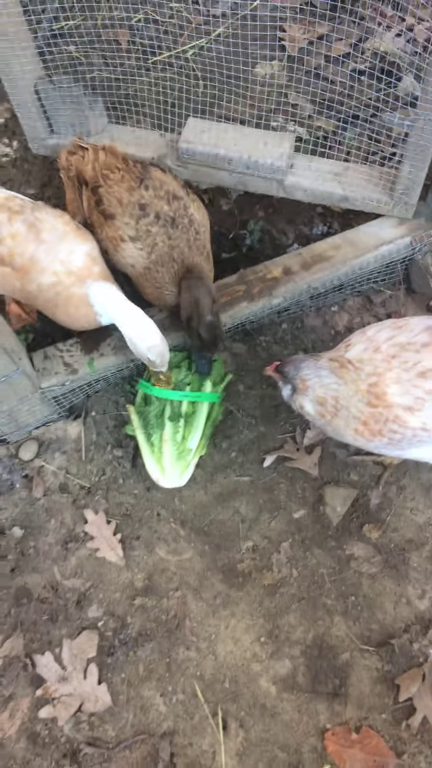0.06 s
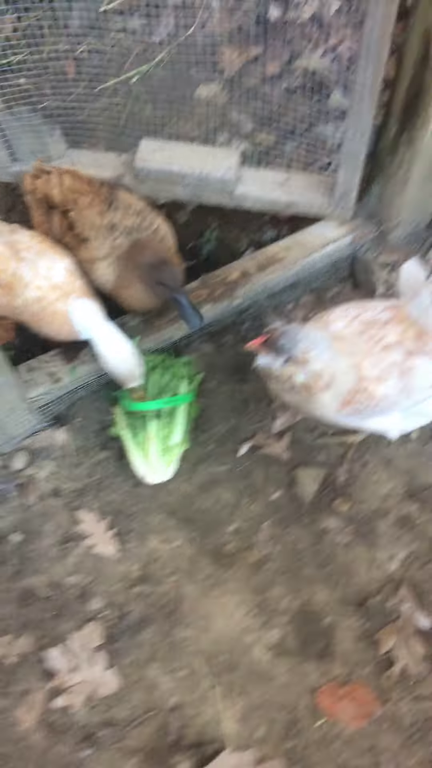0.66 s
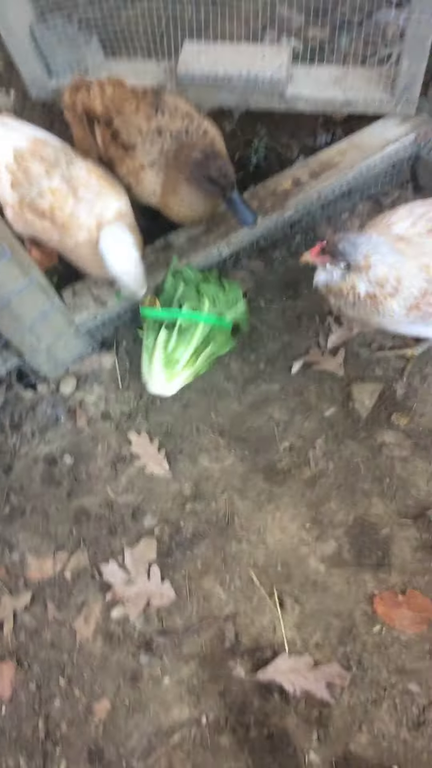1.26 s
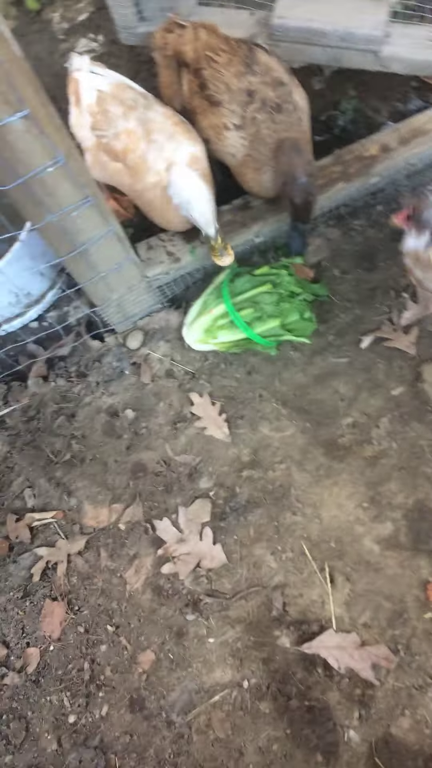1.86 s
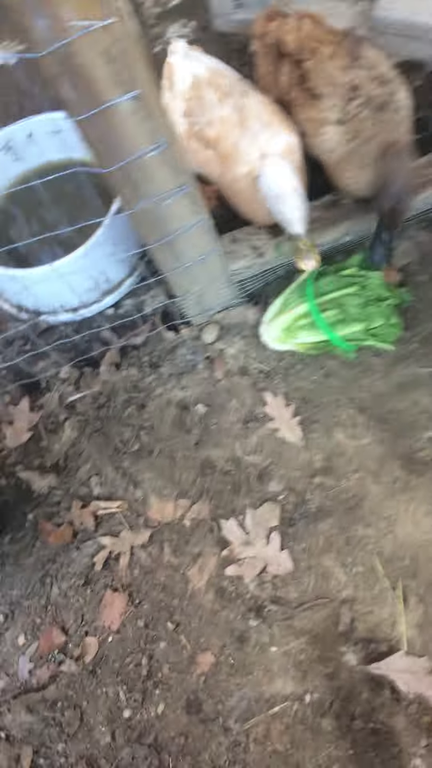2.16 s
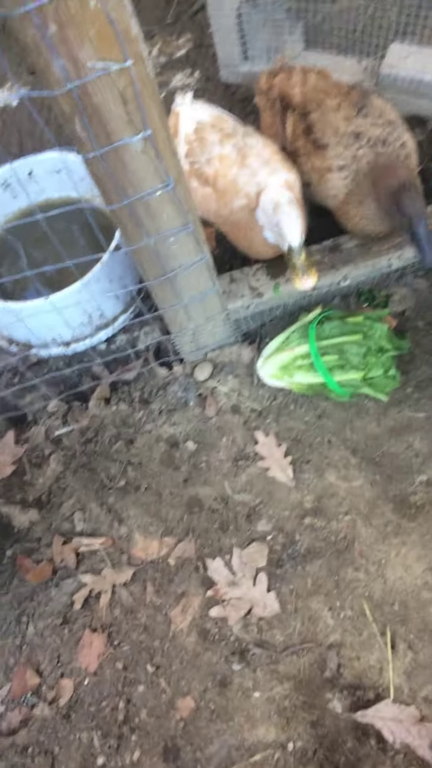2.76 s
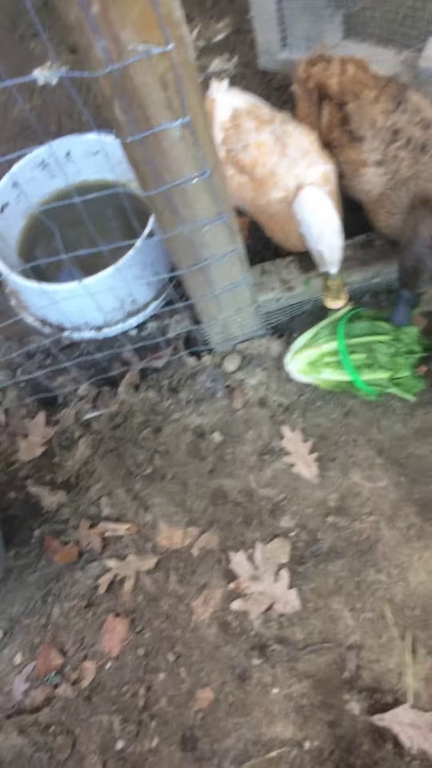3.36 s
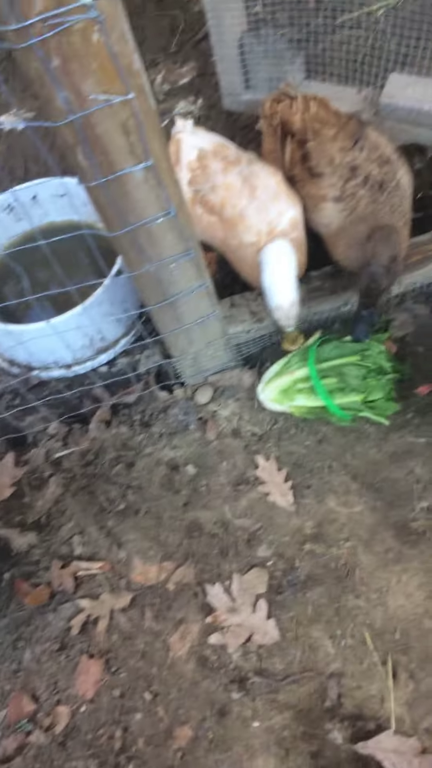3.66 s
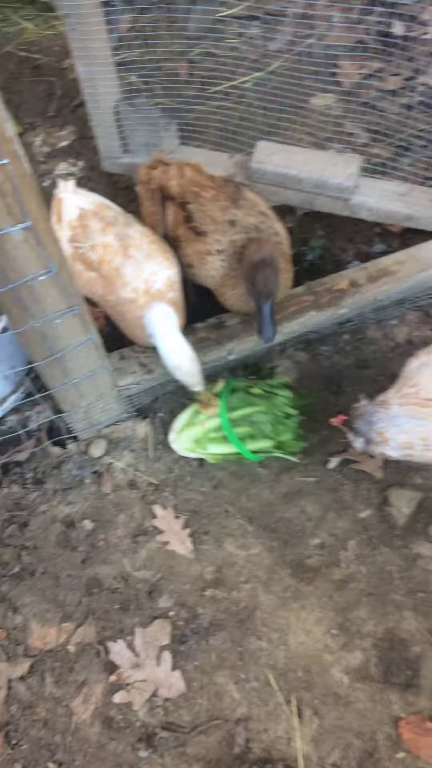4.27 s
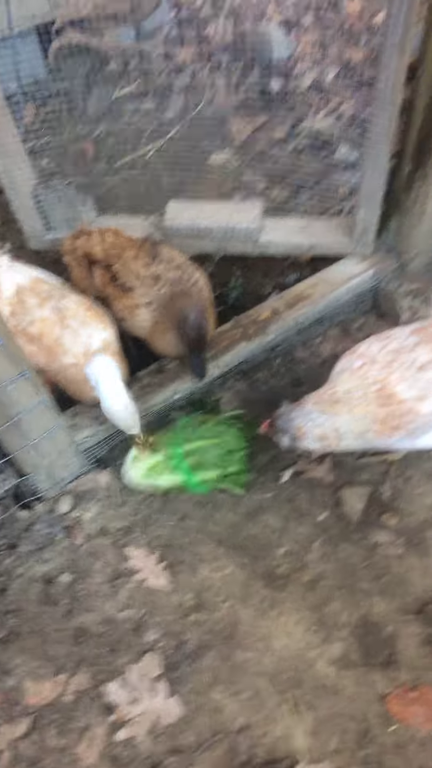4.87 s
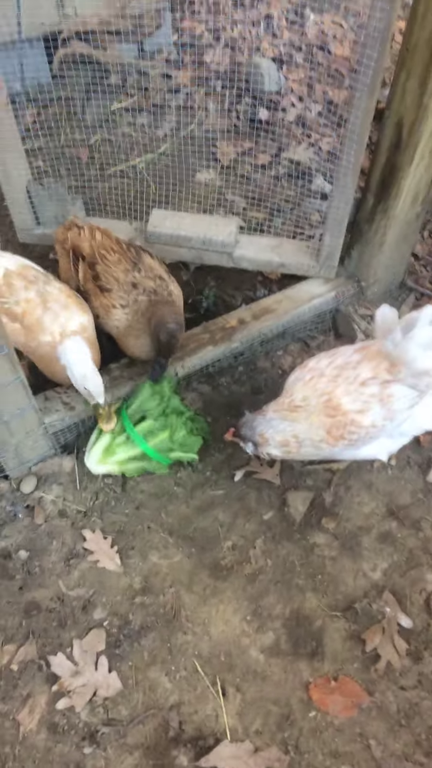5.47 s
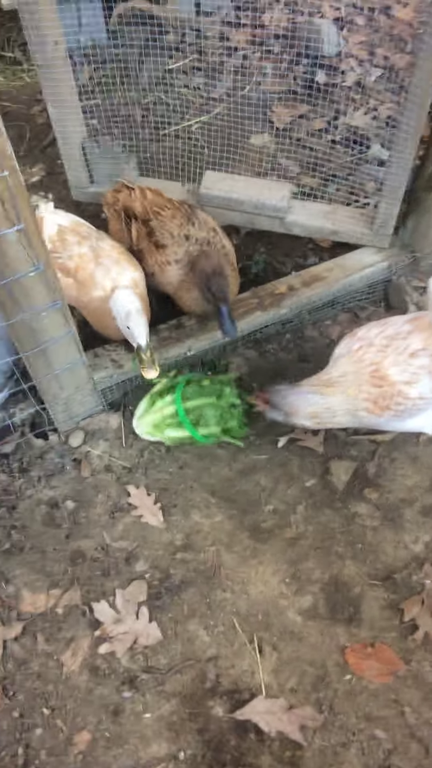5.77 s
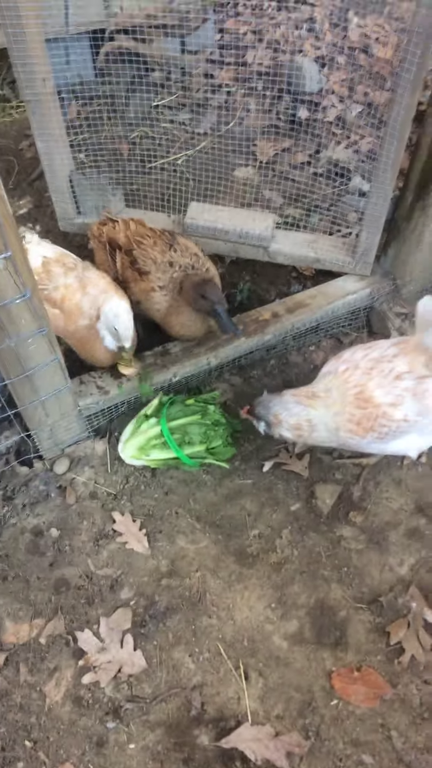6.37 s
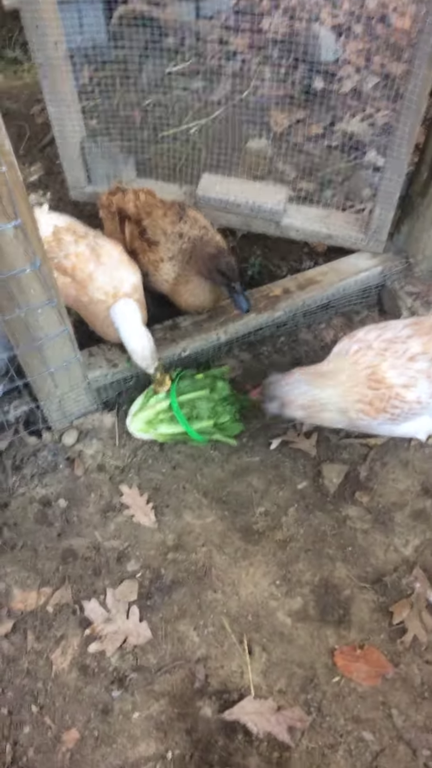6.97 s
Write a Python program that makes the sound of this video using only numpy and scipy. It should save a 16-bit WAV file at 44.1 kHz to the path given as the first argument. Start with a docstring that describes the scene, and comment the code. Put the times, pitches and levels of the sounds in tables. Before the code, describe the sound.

Two ducks eat lettuce close by in an outdoor pen, making a continuous fine crackle over dull scuffs of soil. In the first second or so, leaf ribs snap, wet bills clap and a few pecks knock on a wooden sill. A faint, distant engine hums from about 0.5 to 3 seconds. A hen gives soft, short clucks from 1.3 seconds, a thin, wavering, slightly raspy croon just after 2, and another cluck at 2.5, while the feeding eases. From about 3.7 seconds the tearing, crunching and snapping pick up, busiest between 4.7 and 5.6. The hen clucks again from 5 to 5.8 seconds. Lighter nibbles and taps continue to the end at about 7 seconds. Soft low bumps and a slight rumble of moving air touch the microphone now and then, mostly around 3 and 5.5 to 6 seconds. Echoes are very short.

```python
"""Ducks eating lettuce

Two ducks nibble and tear a head of lettuce in an outdoor pen while a hen clucks and croons softly.
Leaves rustle, ribs snap, wet bills crunch, clap and knock on a wooden sill; boards and ground throw
back short echoes. An engine hums far away, and feet, hand and moving air bump the microphone softly."""
import sys
import numpy as np
from scipy import signal
from scipy.fft import rfft, irfft
from scipy.io import wavfile

SR = 44100
rng = np.random.default_rng(int(sys.argv[2]) if len(sys.argv) > 2 else 0)


def put_to_file(sound):
    """Save the sound as 16-bit audio at rate SR, in the file named by the first command-line argument."""
    columns = np.atleast_2d(sound).T  # one column per channel
    safe = np.clip(columns, -1, 1)
    whole_steps = np.round(safe * 32767)
    wavfile.write(sys.argv[1], SR, whole_steps.astype(np.int16))


N = 313992
TIME = np.arange(N) / SR


def amp(db):
    """Decibels to gain."""
    return 10 ** (np.asarray(db) / 20)


def unit(x):
    """Scales to rms 1."""
    return x / np.sqrt(np.mean(x ** 2) + 1e-20)


def read(points, hz):
    """Reads a curve on a log-frequency axis."""
    f, value = np.transpose(points)
    return np.interp(np.log(hz + 1), np.log(f + 1), value)


def add(mix, start_s, sound):
    """Mixes a sound in at start_s."""
    part = mix[max(round(start_s * SR), 0):][:len(sound)]
    part += sound[:len(part)]


def ring(gain_db, size=2048):
    """The minimum-phase impulse response, of energy 1, of a gain given as a function of frequency."""
    hz = abs(np.fft.fftfreq(size, 1 / SR)) + 1
    log_gain = np.log(amp(np.maximum(gain_db(hz), -90)))
    response = np.fft.ifft(np.exp(np.conj(signal.hilbert(log_gain)))).real[:size // 2]
    return response / np.linalg.norm(response)


def bell(hz, octaves, ring_hz, ring_db, q):
    """The colour of one break: a broad band around hz, plus one resonance of leaf, bill or board."""
    def gain_db(f):
        broad = (1 + (np.log2(f / hz) / octaves) ** 2 / 6) ** -3.5 * hz / f
        low_cut = 1 / (1 + (350 / f) ** 4)
        resonance = 1 + amp(ring_db) ** 2 / (1 + (q * (f / ring_hz - 1)) ** 2)
        return 10 * np.log10(broad * low_cut * resonance + 1e-12)
    return ring(gain_db)


def tint(x, spectrum):
    """Gives a long sound a spectrum, at rms 1."""
    gain = amp(read(spectrum, np.fft.rfftfreq(len(x), 1 / SR)))
    return unit(irfft(rfft(x) * gain, len(x)))


def resonate(x, hz, width_hz):
    """One resonance with gain near 1 at its peak; hz may glide."""
    turn = np.exp(2j * np.pi * np.cumsum(hz * np.ones(len(x))) / SR)
    pole = np.exp(-np.pi * width_hz / SR)
    return 2 * (turn * signal.lfilter([1 - pole], [1, -pole], x / turn)).real


def drift(hz):
    """A random wander of rms 1, no faster than hz."""
    return unit(irfft(rfft(rng.standard_normal(N)) * (np.fft.rfftfreq(N, 1 / SR) < hz), N))


def breaks(size, per_s, spread_db):
    """Random clicks of either sign: many small, a few large."""
    chance, strength, side = rng.random((3, size))
    level_db = spread_db * np.minimum(-np.log(1 - strength), 4)
    return (chance < per_s / SR) * np.sign(side - .5) * amp(level_db)


def crush(length_s, colour, per_s=3200, spread_db=2.0, mush=0.064, size=4096):
    """A pressing bill sets off a run of tiny breaks that ring with a colour; rms 1 over length_s."""
    pressure = np.exp(-(np.abs(np.arange(size) / SR / length_s - .5) * 2) ** 3)
    cells = breaks(size, per_s, spread_db) + mush * rng.standard_normal(size)
    crunch = signal.fftconvolve(cells * pressure, colour)
    return crunch * np.sqrt(length_s * SR / np.sum(crunch ** 2))


def pen(x, near_db, tail_db, size=12000, echoes=8):
    """Adds a few early echoes from ground and boards, then a faint short tail."""
    # how long the pen rings: frequency_hz, t60_s
    decay = [(200, 0.26), (1000, 0.1), (4000, 0.045), (15000, 0.019)]
    near = np.zeros(size)
    delays = (rng.uniform(.002, .014, echoes) * SR).astype(int)
    near[delays] = rng.choice([-1, 1], echoes) / np.sqrt(echoes)
    hz, t, noise = signal.stft(rng.standard_normal(size), SR, nperseg=256)
    tail = signal.istft(noise * amp(-60 * t / read(decay, hz)[:, None]), SR, nperseg=256)[1][:size]
    tail *= np.minimum(np.arange(size) / SR / 0.00098, 1)
    response = amp(near_db) * near + amp(tail_db) * tail / np.linalg.norm(tail)
    return x + signal.oaconvolve(x, response)[:N]


def outdoors(air_db=-61, engine_hz=82, waver=0.0063):
    """A bed of still air, and a far engine whose hum swells and then sinks back."""
    # colour of the open air: frequency_hz, gain_db
    air = [(20, -27), (55, 11), (85, 8), (160, -1.5), (335, -7), (734, -5), (1250, -6.5), (2100, -26.5),
           (3700, -20), (15000, -24)]
    engine_db = np.interp(TIME, [0, .4, .9, 2.3, 3.1], [-87, -69.5, -64.0, -65.5, -72.5])
    turns = np.cumsum(engine_hz * (1 + waver * drift(8.2))) / SR
    engine = np.sqrt(2) * np.sin(2 * np.pi * turns)
    return amp(air_db) * tint(rng.standard_normal(N), air) + amp(engine_db) * engine


def leaf_ticks(per_s=1800, bands=12):
    """Nibbled leaves give off tiny ticks all across the treble."""
    ticks = np.zeros(N)
    for hz in np.geomspace(1500, 15000, bands):
        clicks = breaks(N, per_s / bands, spread_db=1)
        colour = bell(hz, octaves=0.53, ring_hz=hz, ring_db=6.9, q=14)
        ticks += np.sqrt(hz) * signal.oaconvolve(clicks, colour)[:N]
    return unit(ticks)


def wet_ticks(per_s=260, bands=36, size=500):
    """Wet bills part with tiny pitched ticks that die within a few cycles."""
    t, out = np.arange(size) / SR, np.zeros(N)
    for hz in np.geomspace(2200, 7000, bands):
        tick = np.exp(-t * hz / 5) * np.sin(2 * np.pi * hz * t)
        out += hz * signal.oaconvolve(breaks(N, per_s / bands, spread_db=2.1), tick)[:N]
    return unit(out)


def tugging(rise_share=0.48, release_share=0.39):
    """Envelopes for tearing and dragging the leaves: each tug tightens, holds and lets go."""
    # tugs that drag leaves over the soil: start_s, length_s, crackle_db, scuff_db
    tugs = [(0.154, 0.042, -51, -80), (0.226, 0.1, -46.5, -57), (0.378, 0.15, -52.5, -60),
            (0.648, 0.13, -72, -54.5), (1.137, 0.084, -50, -68), (1.484, 0.16, -59, -53.5),
            (1.593, 0.13, -55, -59), (2.8, 0.096, -57.5, -76), (3.05, 0.22, -61.5, -62),
            (3.408, 0.12, -61.5, -64), (3.673, 0.058, -47, -52.5), (3.724, 0.059, -56.5, -57.5),
            (3.858, 0.091, -54, -54), (3.92, 0.21, -47.5, -57.5), (4.168, 0.17, -54, -78),
            (4.338, 0.18, -51.5, -66), (4.496, 0.089, -54, -56.5), (4.549, 0.16, -57.5, -61.5),
            (4.682, 0.095, -47.5, -51.5), (4.796, 0.15, -50, -59.5), (4.946, 0.097, -46, -51.5),
            (5.207, 0.16, -46, -51), (5.442, 0.037, -49, -61), (5.56, 0.07, -44, -55),
            (5.76, 0.27, -58, -60), (6.1, 0.048, -80, -54), (6.227, 0.1, -56.5, -58),
            (6.29, 0.14, -56, -71), (6.628, 0.058, -55.5, -52.5), (6.998, 0.051, -54.5, -53.5)]
    pull, drag = np.zeros((2, N))
    for start_s, length_s, crackle_db, scuff_db in tugs:
        progress = np.arange(0, length_s, 1 / SR) / length_s
        effort = np.clip(np.minimum(progress / rise_share, (1 - progress) / release_share), 0, 1)
        add(pull, start_s, amp(crackle_db) * effort)
        add(drag, start_s, amp(scuff_db) * effort)
    return pull, drag


def rustle(leaves_trim_db=-4, feet_trim_db=-2, clump_db=2.4, dabble_per_s=8.2, dabble_db=3):
    """Leaves crackle in clumps and tear fibre by fibre, over the duller scuff of bills and feet."""
    # how busily the birds shuffle between tugs: time_s, leaves_db, feet_db
    shuffle = [(0, -50.5, -56), (0.9, -55.5, -58.5), (1.45, -51, -56.5), (1.9, -62.5, -65.5),
               (2.55, -59, -66.5), (3.1, -58.5, -65.5), (3.6, -64.5, -65.5), (4.2, -62, -63),
               (4.8, -57, -61.5), (5.05, -47.5, -50), (5.5, -50.5, -54), (5.75, -54.5, -60),
               (6.3, -59, -60), (6.58, -59.5, -66.5), (7.1, -58, -61.5)]
    # crisp colour of nibbled leaves: frequency_hz, gain_db
    crackle = [(500, -20), (1500, 0.5), (2500, 0.5), (4200, 3), (6500, 1.5), (9500, 3), (13000, 0),
               (16000, -5.5)]
    # bright colour of a tearing leaf: frequency_hz, gain_db
    tear = [(500, -12), (1500, 4), (2500, 0), (4200, 7), (4900, 2), (6500, 4.5), (9500, 3), (13000, 2),
            (16000, -5.5)]
    # dull colour of scuffed soil: frequency_hz, gain_db
    scuff = [(90, -13), (220, 6), (420, 4), (700, 9.5), (1100, 0.5), (1800, 2.5), (3000, -10.5),
             (8000, -13)]
    time_s, leaves_db, feet_db = np.transpose(shuffle)
    pull, drag = tugging()
    clumps = amp(clump_db * drift(70))
    # a feeding bill chatters open and shut
    chatter_db = dabble_db * np.sin(2 * np.pi * np.cumsum(dabble_per_s * (1 + 0.26 * drift(9.6))) / SR)
    ticks = leaf_ticks()
    fibres = unit(pen(breaks(N, per_s=1000, spread_db=2.9), near_db=-6, tail_db=-7))
    grain = .7 * ticks + .5 * wet_ticks() + np.roll(fibres, N // 2)  # out of step with the tearing
    soil = tint(unit(breaks(N, per_s=1200, spread_db=0.95)) + 1.17 * rng.standard_normal(N), scuff)
    nibbling = tint(grain, crackle) * amp(np.interp(TIME, time_s, leaves_db) + leaves_trim_db + chatter_db)
    tearing = tint(fibres, tear) * pull
    scuffing = soil * np.hypot(amp(np.interp(TIME, time_s, feet_db) + feet_trim_db), drag)
    return clumps * (nibbling + tearing + scuffing)


def snaps(trim_db=-1, splinter=0.28, splinter_s=0.0016, size=300):
    """A leaf rib gives way at once and splinters for a millisecond or two; the broken piece rings."""
    # single cracks of a rib: start_s, level_db, centre_hz, ring_hz
    cracks = [(0.2513, -39.5, 4530, 4600), (0.274, -37.5, 3550, 4470), (0.2873, -36, 1700, 720),
              (0.2955, -43, 1480, 700), (1.0431, -35, 10150, 8400), (1.3765, -42, 2540, 3700),
              (1.566, -39, 4270, 11500), (2.34, -41, 9440, 3830), (3.694, -29.5, 6100, 6600),
              (3.7666, -38.5, 8750, 3980), (4.0056, -43, 6030, 4220), (4.037, -40, 8000, 4170),
              (4.052, -39, 6250, 11000), (4.1959, -41.5, 2570, 1530), (4.4112, -37, 6250, 6040),
              (4.4679, -32, 5100, 3450), (4.72, -35, 2620, 2080), (4.8233, -37, 8070, 3840),
              (4.836, -36, 6270, 10400), (5.276, -38, 5320, 4020), (5.2848, -40, 8000, 7500),
              (5.3013, -35.5, 9360, 7100), (5.3832, -30.5, 8450, 7200), (5.5758, -35.5, 6130, 4470),
              (5.5945, -38.5, 7900, 4700), (6.6483, -44, 4860, 830)]
    out, t = np.zeros(N), np.arange(size) / SR
    for start_s, level_db, centre_hz, ring_hz in cracks:
        fracture = (t == 0) + splinter * rng.standard_normal(size) * np.exp(-t / splinter_s)
        crack = np.convolve(fracture, bell(centre_hz, octaves=0.72, ring_hz=ring_hz, ring_db=11, q=9))
        crack *= np.sqrt(.003 * SR / np.sum(crack ** 2))  # the energy of 3 ms at rms 1
        add(out, start_s, amp(level_db + trim_db) * crack)
    return out


def rasps():
    """The ridged edge of a bill catches and slips on a rib; each slip rings the hollow of the bill."""
    # scrapes along a rib: start_s, length_s, level_db, ring_hz
    scrapes = [(0.255, 0.016, -44, 4500), (3.973, 0.15, -57, 4150), (4.386, 0.062, -51.5, 5840),
               (5.27, 0.075, -56, 4240)]
    out = np.zeros(N)
    for start_s, length_s, level_db, ring_hz in scrapes:
        hollow = bell(ring_hz, octaves=1.0, ring_hz=ring_hz, ring_db=15, q=16)
        add(out, start_s, amp(level_db) * crush(length_s, hollow, per_s=900, mush=.03, size=8192))
    return out


def pecks(board_hz=700, thump_hz=290, thump_db=-18):
    """The bill knocks through the leaf onto the wooden sill, which answers with a dull thump."""
    # knocks on the sill: start_s, length_s, level_db, centre_hz
    knocks = [(0.287, 0.014, -35.5, 1220), (0.4925, 0.0034, -39.5, 2010), (0.505, 0.013, -45.5, 1210),
              (0.883, 0.01, -50, 1500), (3.131, 0.011, -43, 755), (3.489, 0.018, -44.5, 1720),
              (3.782, 0.017, -49.5, 8000), (3.89, 0.017, -49.5, 1690), (4.062, 0.0044, -47, 2500),
              (4.974, 0.0083, -46, 6000), (5.528, 0.022, -45.5, 2200), (5.913, 0.022, -56.5, 1900),
              (6.442, 0.021, -55, 1920), (7.009, 0.0098, -52.5, 4000)]
    out = np.zeros(N)
    sill = bell(thump_hz, octaves=0.62, ring_hz=thump_hz, ring_db=7.2, q=2)
    for start_s, length_s, level_db, centre_hz in knocks:
        knock = crush(length_s, bell(centre_hz, octaves=0.96, ring_hz=board_hz, ring_db=8, q=6))
        thump = amp(thump_db) * crush(length_s, sill)
        add(out, start_s, amp(level_db) * (knock + thump))
    return out


def claps(splash_ratio=1.25):
    """A wet bill shuts: its cavity pings, under a fine splash centred a little above the ping."""
    # bill claps, pitched by how far the bill is open: start_s, length_s, level_db, ring_hz
    closures = [(0.335, 0.0053, -38, 3000), (0.347, 0.0054, -43.5, 3470), (0.35, 0.0075, -42.5, 1680),
                (0.388, 0.0097, -39.5, 3100), (0.622, 0.015, -45.5, 3200), (0.744, 0.0089, -48, 5540),
                (0.809, 0.011, -50.5, 2370), (0.968, 0.0093, -45, 4200), (1.012, 0.0073, -42, 3400),
                (1.048, 0.0078, -45.5, 3780), (1.101, 0.005, -44.5, 4300), (1.126, 0.0083, -50, 3280),
                (2.34, 0.015, -50.5, 3920), (2.872, 0.01, -51, 3960), (2.928, 0.0046, -62, 5330),
                (2.949, 0.01, -57.5, 3930), (2.998, 0.0042, -54, 6160), (3.103, 0.0052, -50, 2500),
                (3.256, 0.003, -57, 4850), (3.759, 0.0023, -44.5, 3080), (3.876, 0.0019, -33.5, 4170),
                (4.414, 0.0039, -42.5, 1980), (4.6, 0.012, -48, 5960), (4.737, 0.0021, -33, 5250),
                (6.327, 0.012, -52.5, 4030)]
    out = np.zeros(N)
    for start_s, length_s, level_db, ring_hz in closures:
        cavity = bell(splash_ratio * ring_hz, octaves=.58, ring_hz=ring_hz, ring_db=13, q=11)
        add(out, start_s, amp(level_db) * crush(length_s, cavity, per_s=6000, spread_db=1))
    return out


def bites(bill_hz=3930):
    """Leaf cells burst in the bill with a bright, broad crunch."""
    # bites that crush a leaf (the row at 5.106 s is a knock of the bill on the sill): start_s, length_s,
    # level_db, centre_hz
    crunches = [(1.043, 0.025, -45.5, 9900), (1.645, 0.025, -47, 11100), (2.477, 0.011, -43.5, 10300),
                (3.066, 0.0094, -55.5, 8000), (3.123, 0.012, -49.5, 9150), (3.482, 0.022, -49, 11000),
                (3.843, 0.022, -46, 8000), (4.004, 0.0085, -36.5, 5700), (4.027, 0.0082, -49, 8060),
                (4.269, 0.038, -57.5, 8040), (4.449, 0.016, -42, 6800), (4.728, 0.0064, -35, 6500),
                (4.902, 0.015, -41.5, 11300), (5.044, 0.015, -45.5, 8800), (5.106, 0.0064, -42.5, 2780),
                (5.162, 0.015, -42.5, 7600), (5.225, 0.006, -44.5, 6050), (5.262, 0.0059, -41, 7400),
                (5.319, 0.015, -39.5, 5000), (5.392, 0.0067, -49, 4500), (5.623, 0.014, -47, 6000),
                (6.387, 0.011, -51.5, 4900)]
    out = np.zeros(N)
    for start_s, length_s, level_db, centre_hz in crunches:
        colour = bell(centre_hz, octaves=0.73, ring_hz=bill_hz, ring_db=4, q=10)
        add(out, start_s, amp(level_db) * crush(length_s, colour))
    return out


def clucks(chest_hz=225, upper_hz=1197, gape_hz=1800, gape_s=0.0047, throat_glide=0.11, size=6000):
    """Short runs of uneven pulses swell and die, ringing the chest and the opening throat of a hen."""
    # the hen's clucks: start_s, length_s, level_db, first_hz, last_hz, roughness (0-1),
    # lower_hz and upper_db (throat resonances), gape_db, crest (share of the length)
    calls = [(1.313, 0.026, -50, 208, 158, 0.19, 770, -23, -30, 0.25),
             (1.541, 0.061, -48.5, 214.3, 185, 0.45, 704, -6, -5, 0.35),
             (1.702, 0.055, -49.5, 232, 248, 0.28, 576, -18, -24, 0.21),
             (1.852, 0.0345, -47, 159.8, 138.4, 0.34, 600, -2, -33, 0.2),
             (1.984, 0.046, -48, 242.3, 248, 0.11, 724, -10.5, -6.5, 0.65),
             (2.493, 0.041, -41.5, 222, 191.7, 0.57, 700, -3.5, -30, 1),
             (5.052, 0.018, -44.5, 198, 195, 0.29, 790, -23, -20, .3),
             (5.118, 0.063, -41, 198.7, 179.2, 0.2, 755, -15, -6, 0.28),
             (5.234, 0.024, -48.5, 199, 210, 0.25, 780, -6, -25, .5),
             (5.288, 0.088, -49.5, 187.8, 168.8, 0.17, 710, -11, -7, 0.42),
             (5.483, 0.072, -43.5, 226, 157.7, 0.27, 700, -26, -2.5, 0.071),
             (5.558, 0.026, -49.5, 166, 160, 0.37, 750, -24, -18, .4),
             (5.717, 0.043, -44, 216.4, 190, 0.26, 690, -20.5, -16, 0.13),
             (5.755, 0.049, -50, 169.3, 148.5, 0.35, 740, -27, -30, 0.24)]
    # her nearly shut beak muffles the voice but leaves a faint edge: frequency_hz, gain_db
    muffle = [(100, -4.5), (1330, -1), (1540, -12), (1730, -11), (2200, -15), (2700, -18), (3400, -28),
              (6000, -50)]
    jitter, flutter_db = .26, 6
    out, waver, flutter = np.zeros(N), drift(140), drift(160)
    beak = ring(lambda f: read(muffle, f))
    beak /= abs(rfft(beak)).max()
    for call in calls:
        start_s, length_s, level_db, first_hz, last_hz, rough, lower_hz, upper_db, gape_db, crest = call
        span = slice(round(start_s * SR), round(start_s * SR) + size)
        progress = np.minimum(np.arange(size) / SR / length_s, 1)
        pitch_hz = np.interp(progress, [0, 1], [first_hz, last_hz]) * (1 + jitter * rough * waver[span])
        turns = np.cumsum(pitch_hz) / SR
        pulses = unit(1. * (np.diff(np.floor(turns), prepend=-1) > 0))
        puffs = unit(rng.standard_normal(size) * np.exp(-(turns % 1) / 0.34))
        effort = np.interp(progress, [0, min(crest, .8), .85, 1], [0.55, 1, 0.7, 0])
        drive = ((1 - rough) * pulses + rough * puffs) * effort * amp(flutter_db * rough * flutter[span])
        lower = resonate(drive, lower_hz * (1 + throat_glide * (progress - .5)), width_hz=180)
        upper = amp(upper_db) * resonate(drive, upper_hz, width_hz=210)
        chest = amp(chest_db := upper_db / 2) * resonate(drive, chest_hz, width_hz=120)
        muffled = signal.fftconvolve(lower + upper + chest, beak)[:size]
        # at the crest her beak gapes for a moment and lets out a bright resonance
        gape = amp(gape_db) * np.exp(-.5 * ((progress - crest) * length_s / gape_s) ** 2)
        voice = muffled + resonate(gape * drive, gape_hz, width_hz=200)
        add(out, start_s, amp(level_db) * voice * np.sqrt(length_s * SR / np.sum(voice ** 2)))
    return out


def thuds(width_s=0.0061, lumps_db=4, sway_trim_db=1):
    """Feet and the hand on the microphone thud for a cycle or two over the rumble of moving air."""
    # soft bumps: time_s, peak_db, pitch_hz
    bumps = [(1.491, -43, 65), (2.055, -44, 79.5), (2.81, -35, 68.6), (2.949, -41.5, 91.5),
             (3.431, -38.5, 78.4), (3.58, -42, 118), (5.033, -45, 238), (5.508, -32.5, 78),
             (5.572, -39, 68.6), (5.792, -41, 95), (5.827, -36, 112), (6.048, -36, 76), (6.127, -50.5, 238),
             (6.361, -40, 72.6), (7.109, -38, 72)]
    # air moving over the microphone: time_s, level_db
    sway = [(0, -72), (1.3, -78), (2.2, -61.5), (3.2, -65.5), (3.6, -63.5), (4.4, -74), (5.7, -54),
            (7.1, -64.5)]
    # colour of that moving air: frequency_hz, gain_db
    rumble = [(20, -50), (40, -4.5), (60, -8), (100, -10.5), (160, -22), (300, -22.5), (800, -56)]
    out, t = np.zeros(N), np.arange(-SR // 20, SR // 20) / SR
    envelope = np.exp(-.5 * (t / width_s) ** 2)
    for time_s, peak_db, pitch_hz in bumps:
        tone = np.cos(2 * np.pi * (pitch_hz * t + rng.random()))
        add(out, time_s + t[0], amp(peak_db) * envelope * tone)
    rumble_db = np.interp(TIME, *np.transpose(sway)) + sway_trim_db + lumps_db * drift(12)
    return out + amp(rumble_db) * tint(rng.standard_normal(N), rumble)


def croon(jitter=.08, rasp=3, doubling=1.7, harmonics=7):
    """The hen's thin note falls and rises; where it breaks, strong and weak cycles alternate in a rasp."""
    # her drawn-out note: time_s, pitch_hz, level_db, roughness (0-1)
    contour = [(2.036, 490, -55, .2), (2.066, 418, -50.5, .04), (2.088, 480, -52.5, .3),
               (2.11, 505, -51.5, .35), (2.147, 368, -52, .25), (2.158, 434, -50, .1),
               (2.178, 405, -51.5, .08), (2.201, 332, -53, .1), (2.212, 342, -53.5, .1),
               (2.219, 320, -62, .3), (2.226, 298, -50, .03), (2.265, 314, -47.5, .03),
               (2.273, 418, -52.5, .25), (2.302, 432, -49.5, .15), (2.34, 488, -51.5, .25),
               (2.358, 510, -58, .4)]
    # resonances of her throat: frequency_hz, gain_db
    throat = [(300, -2), (600, -0.5), (870, 6.5), (1080, 1), (1290, 3), (1520, -13), (2500, -25)]
    time_s, *columns = np.transpose(contour)
    t, out = np.arange(time_s[0], time_s[-1], 1 / SR), np.zeros(N)
    pitch_hz, level_db, rough = (np.interp(t, time_s, column) for column in columns)
    turns = np.cumsum(pitch_hz * (1 + jitter * rough * drift(200)[:len(t)])) / SR
    note = sum(amp(read(throat, k * pitch_hz)) * np.cos(2 * np.pi * k * turns)
               for k in range(1, harmonics + 1))
    note *= 1 + doubling * rough * np.cos(np.pi * turns)
    scrape = tint(rng.standard_normal(len(t)) * np.exp(-2 * (turns % 1)), throat)
    voice = unit(unit(note) + rasp * rough * scrape)
    add(out, time_s[0], amp(level_db) * voice * signal.windows.tukey(len(t), .08))
    return out


def scene():
    """Feeding ducks and the hen in their pen, in mono."""
    bills = snaps() + bites() + pecks() + claps() + rasps()
    feeding = pen(bills, near_db=-13.5, tail_db=-14.5) + rustle()
    hen = pen(clucks() + croon(), near_db=-10, tail_db=-13)
    return (feeding + hen + thuds() + outdoors())[None]


def record(dry):
    """A steep low-pass takes off the very top of the treble."""
    edge_hz = 16150
    low_pass = signal.firwin(511, edge_hz, window=("kaiser", 9), fs=SR)
    return signal.oaconvolve(dry, low_pass[None], "same")


dry = scene()
out = record(dry)
put_to_file(out)
```